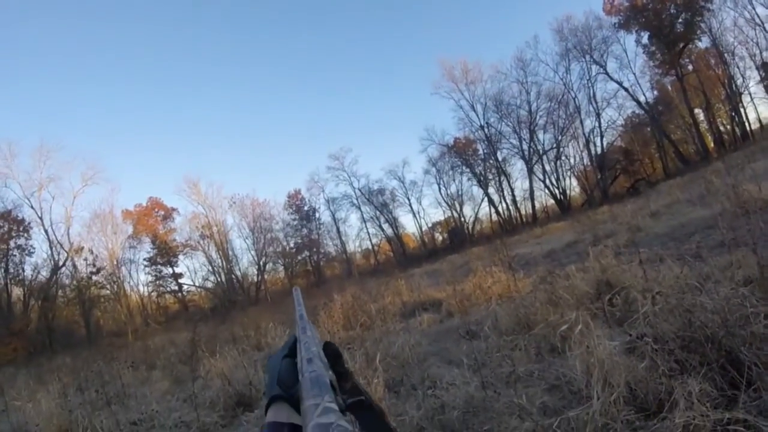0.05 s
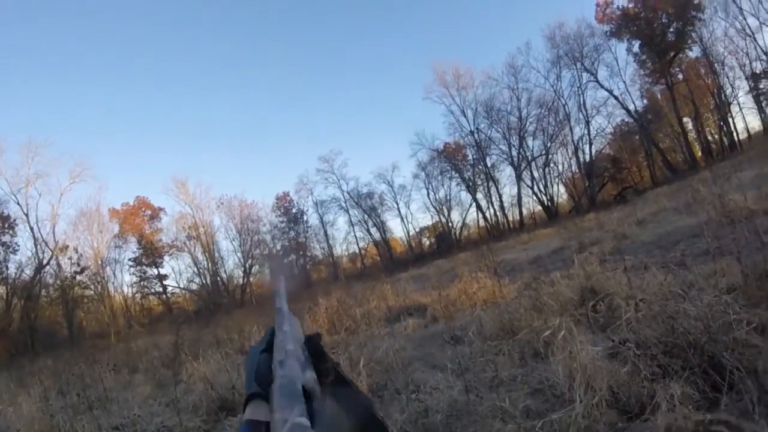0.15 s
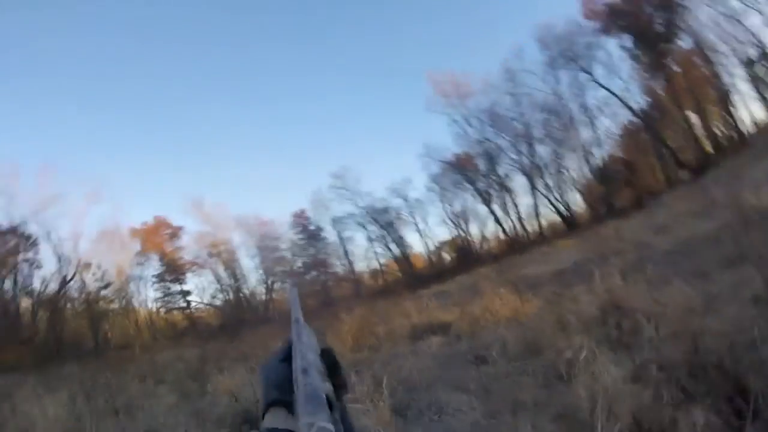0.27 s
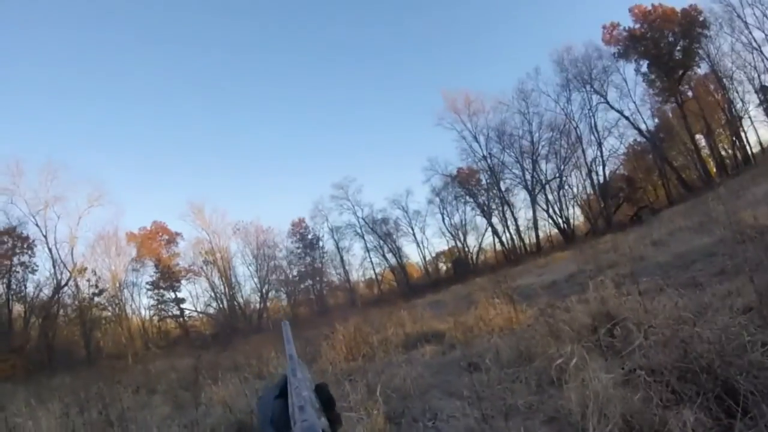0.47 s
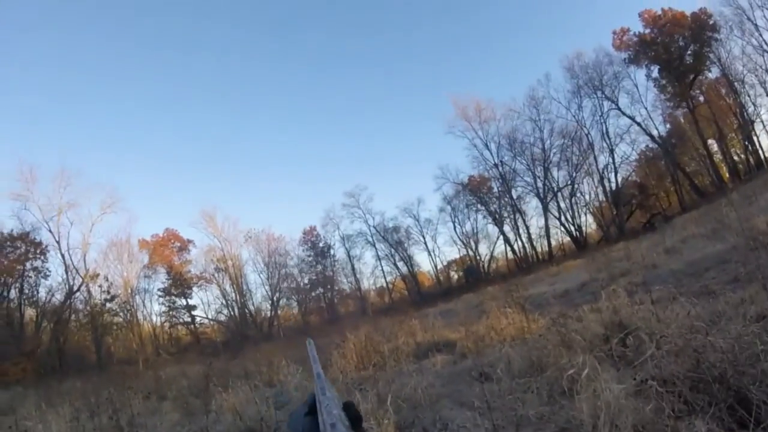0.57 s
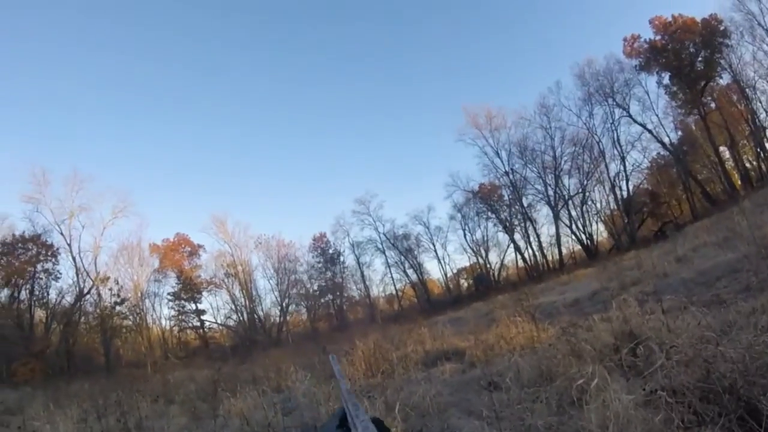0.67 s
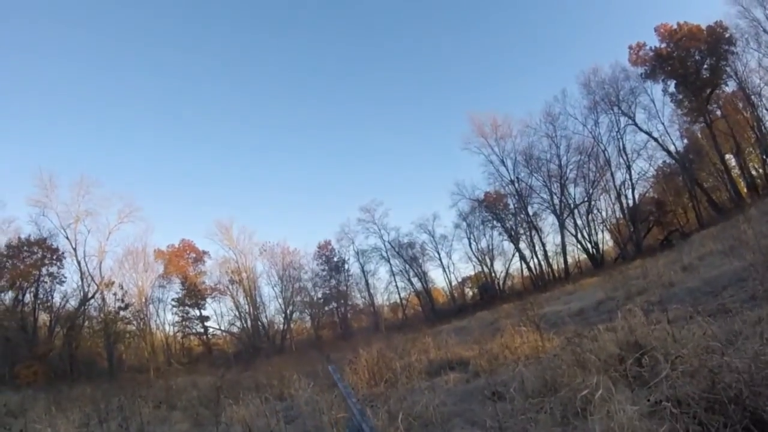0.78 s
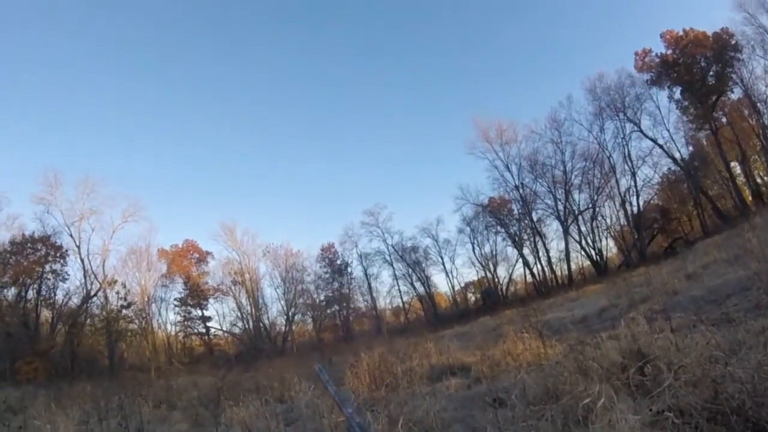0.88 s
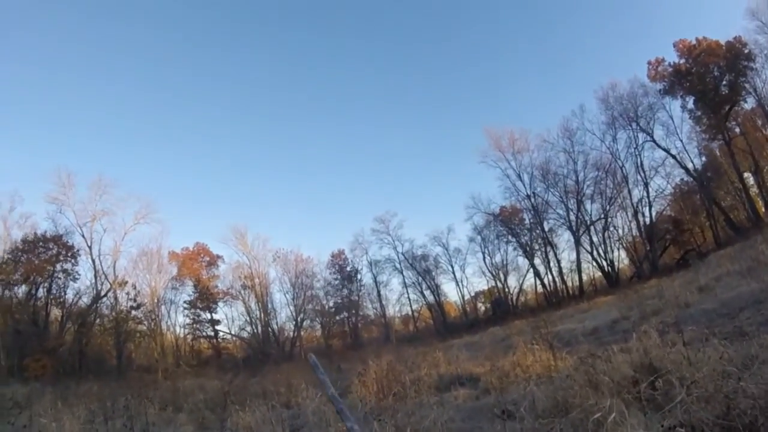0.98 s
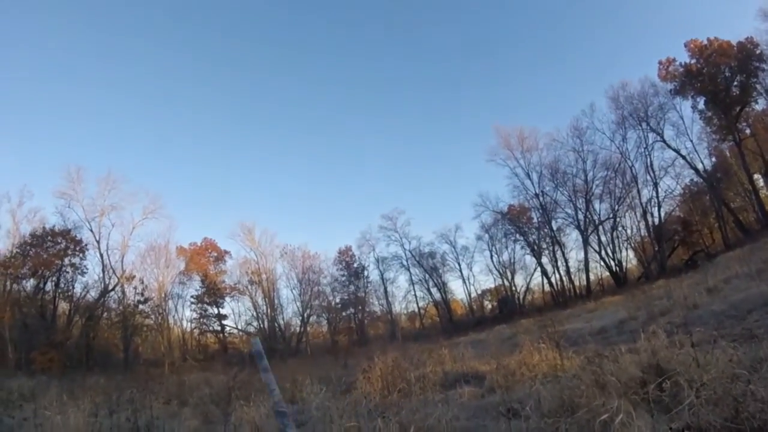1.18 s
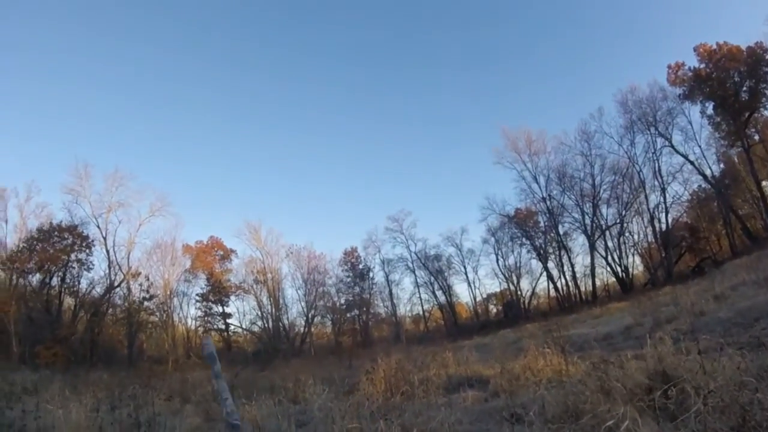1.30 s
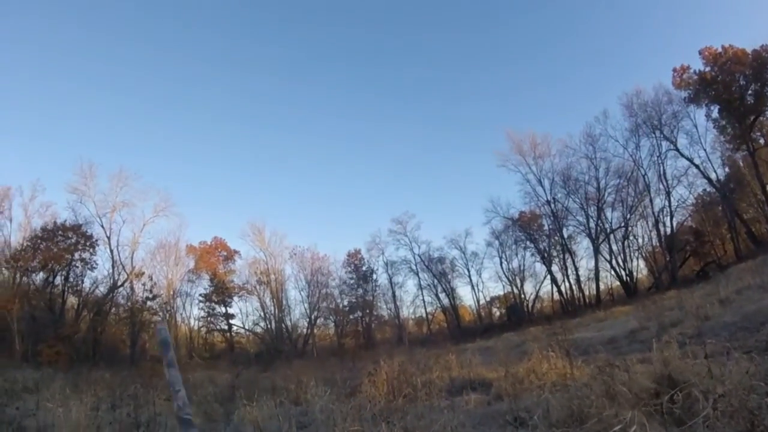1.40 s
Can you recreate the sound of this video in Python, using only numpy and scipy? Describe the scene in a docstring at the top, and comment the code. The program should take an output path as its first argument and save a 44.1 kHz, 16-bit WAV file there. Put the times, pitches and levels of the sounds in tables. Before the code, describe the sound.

A single shotgun shot cracks very close, with a brief clack and quickly dying hiss; the sound ducks, then a rough echo rolls back from the trees over a faint distant rush and small gear noises.

```python
"""An open field ringed by trees: one shotgun shot, heard from the shooter's head.
Shock pulses and damped rings make the crack, then a slow pressure swing; noise bursts make gas and action.
Grass is quickly dying hiss; the tree line is a rolling echo of random impulses, duller with distance.
Shaped noise gives a distant rush, light wind, faint microphone hiss and small gear noises; a look-ahead
limiter ducks them around the shot."""
import sys
import numpy as np
from scipy import signal
from scipy.fft import rfft, irfft
from scipy.io import wavfile
from scipy.ndimage import minimum_filter1d

SR = 44100
rng = np.random.default_rng(int(sys.argv[2]) if len(sys.argv) > 2 else 0)


def to_wav(sig):
    """Store sig (one row per channel, or 1-D mono) as 16-bit WAV at the path in sys.argv[1].

    Samples outside -1..1 are clipped; the rate is SR.
    """
    pcm = np.clip(np.atleast_2d(sig), -1, 1) * 32767
    pcm = np.round(pcm).astype(np.int16)
    wavfile.write(sys.argv[1], SR, pcm.T)  # frames by channels


N = 63945
T = np.arange(N) / SR  # time [s]

# Distant rush with the last far echoes: (time [s], level [dB])
FAR_LEVEL = [(0, -42), (.17, -44), (.45, -51.5), (.8, -41), (1.05, -38), (1.25, -39), (1.45, -40.5)]
# Tone of the distant rush: (frequency [Hz], level [dB])
FAR_COLOUR = [(40, -10.5), (90, -4.5), (135, -2.5), (225, -16), (370, -1.5), (650, 0.5), (820, -2.5),
              (1200, -9), (1900, -14), (2800, -21.5), (4000, -29.5), (6200, -35), (7500, -43), (10000, -53),
              (12000, -58), (14000, -80)]
FAR_DULLING_START_S, FAR_DULLING_DB_PER_KHZ_S = 0.89, 7

# Wind on the microphone: (time [s], level [dB])
WIND_LEVEL = [(0, -65), (.15, -51), (.85, -63), (1.05, -53.5), (1.3, -62.5), (1.38, -50.5), (1.45, -55)]
# Tone of the wind: (frequency [Hz], level [dB])
WIND_COLOUR = [(15, 0), (30, -1), (70, -1.5), (150, -14), (400, -49), (2000, -88)]

# Faint steady microphone hiss, rising slightly later: (time [s], level [dB])
HISS_LEVEL = [(0, -67.5), (.9, -68), (1.25, -63.5), (1.45, -64.5)]
# Ticks of dry grass and clothing: (time [s], level [dB])
TICKS = [(.009, -50), (0.059, -53), (0.1178, -60), (0.16, -52.5), (0.7852, -44), (.813, -50), (.930, -53),
         (0.986, -48.5), (1.422, -46)]
TICK_T60_S = 0.013
# Tone shared by ticks, sleeve and hiss: (frequency [Hz], level [dB])
TICK_COLOUR = [(500, -25), (3000, -11), (4500, -5), (5600, -0.5), (6600, -0.5), (7500, -9.5), (9000, -13),
               (12000, -29), (14000, -43)]
SLEEVE_S, SLEEVE_WIDTH_S, SLEEVE_DB = 1.16, 0.037, -62
# Tinkles of small metal fittings: (time [s], level [dB], pitch [ratio])
TINKLES = [(0.0492, -46, 0.97), (.091, -61, 0.96), (0.108, -61, 1.1), (1.0912, -44.5, 1.01),
           (1.124, -49, 1.1)]
# Modes of one fitting, before pitch and tinkle level: (frequency [Hz], level [dB], t60 [s])
FITTING_MODES = [(5600, -2.5, 0.059), (5800, -5, 0.046), (8300, -23, .04)]

# Rolling echo from the tree line: (time [s], level [dB])
ECHO_LEVEL = [(.415, -43), (0.435, -26.5), (0.443, -36), (.453, -42), (0.464, -30), (0.499, -27.5),
              (0.521, -31), (0.542, -32), (0.551, -37), (0.587, -29), (0.605, -34.5), (0.631, -29.5),
              (0.674, -35), (.704, -28.5), (.742, -37.5), (0.755, -34), (.8, -42.5)]
# Tone of the echo at its middle: (frequency [Hz], level [dB])
ECHO_COLOUR = [(30, -28), (50, -10.5), (80, -5), (180, -2), (300, -2.5), (390, 2.5), (520, -1), (780, 0.5),
               (1000, -3.5), (1400, -11.5), (2000, -13), (2700, -15), (4200, -22.5), (5800, -21),
               (6600, -27), (7500, -35), (10000, -49.5), (12000, -79)]
TRUNKS_PER_S, TRUNK_SPREAD_DB = 5000, 3
ECHO_MID_S, AIR_DB_PER_KHZ_S = 0.56, 3.5
# Single returns that stand out of the echo: (time [s], pitch [Hz], level [dB], t60 [s])
RETURNS = [(.4335, 1900, -25, .016), (.4348, 640, -14, .022), (.745, 470, -29, .13)]

# Levels of grass, gun and blast are relative: SHOT_DB raises all three together
SHOT_S, SHOT_DB = 0.2211, 40.5

# Tone of the scatter from nearby grass: (frequency [Hz], level [dB])
GRASS_COLOUR = [(20, -18), (45, -9), (100, -8), (200, -7), (380, -10), (550, -14.5), (1000, -16),
                (1800, -16.5), (3000, -16.5), (4000, -16.5), (5800, -12), (6600, -14.5), (7500, -22.5),
                (10000, -32.5), (11500, -46), (14000, -79)]
GRASS_DB, GRASS_FALL_DB_PER_S = -31.5, 234.5
EARLY_DB, EARLY_T60_S = -28.5, 0.067

# Hiss bursts from muzzle gas and action: (time [s], level [dB], t60 [s])
CLACKS = [(0.222, -20, 0.013), (0.2223, -23.5, 0.015), (0.2383, -16, 0.0099), (0.2406, -30, 0.035),
          (0.2708, -37, 0.041)]
CLACK_RISE_S = 0.00024
# Tone of the bursts and of the early grass hiss: (frequency [Hz], level [dB])
CLACK_COLOUR = [(300, -8), (1500, -7), (4300, -9.5), (5500, -10), (6600, -2), (8000, -12), (10000, -19),
                (12000, -36), (15000, -55)]
# Dull knocks of the recoil: (time [s], level [dB], decay [s])
KNOCKS = [(0.2698, -25.5, 0.002), (0.3033, -50, .002), (0.3617, -49.5, .002)]

# Shock fronts, direct and off gun and ground: (time [s], level [dB], decay [s], ring [dB])
FRONTS = [(0.2213, -5, .00008, -13), (0.2216, -8, .00008, 0), (0.2294, -11, .00022, -24)]
# Modes of the housing around the microphone: (frequency [Hz], level [dB], t60 [s])
HOUSING_MODES = [(820, -21, .018), (1430, -22, 0.018), (1736, -27, 0.018), (2246, -15, 0.016),
                 (3120, -13.5, 0.017), (3550, -24, 0.01), (5700, -5.5, .0065), (6510, -22, .014),
                 (8600, -24, 0.0095), (11270, -25, .006)]
SWING_S, SWING_DB = 0.2231, -1.5
SWING_RISE_S, SWING_CROSS_S, SWING_DECAY_S = 0.0015, 0.0042, 0.0057

CEILING_DB, RELEASE_DB_PER_S = -0.8, 195
AHEAD_S, HOLD_S, ATTACK_S = 0.0467, 0.035, 0.003
LOW_CUT_HZ, TOP_ROLL_HZ, CUTOFF_HZ = 5.3, 12500, 15600


def from_db(db):
    """Turn decibels into gain."""
    return 10 ** (np.asarray(db) / 20)


def rms_one(x):
    """Scale a signal to unit rms."""
    return x / np.sqrt(np.mean(x ** 2) + 1e-20)


def level(rows):
    """Gain that follows a (time [s], level [dB]) curve."""
    return from_db(np.interp(T, *np.transpose(rows)))


def coloured(colour, source=None):
    """White noise, or a given source, filtered to a tone curve and set to unit rms."""
    hz, db = np.transpose(colour)
    f = np.maximum(np.fft.rfftfreq(N, 1 / SR), 1)
    if source is None:
        source = rng.standard_normal(N)
    gain = from_db(np.interp(np.log(f), np.log(hz), db))
    return rms_one(irfft(rfft(source) * gain, N))


def dying(start, t60):
    """Envelope that opens at once and falls 60 dB in each t60."""
    return (T >= start) * np.exp(-np.log(1000) * np.clip((T - start) / t60, 0, 10))


def pulse(start, decay):
    """Pressure pulse with a steep front, an exponential tail and height 1."""
    u = np.clip((T - start) / decay, 0, 50)
    p = np.exp(-u) * (1 - np.exp(-4 * u))
    return p / p.max()


def ring(start, modes):
    """Damped resonances struck together, with alternating signs."""
    total = np.zeros(N)
    for k, (hz, db, t60) in enumerate(modes):
        tone = np.sin(2 * np.pi * hz * (T - start))
        total += (-1) ** k * from_db(db) * dying(start, t60) * tone
    return total


def through_air(x, loss_db_per_khz):
    """Tilt the treble by a time-varying loss that grows with frequency up to 8 kHz."""
    band_khz = np.array([0, 1, 2, 4, 8])
    f_khz, spectrum = np.fft.rfftfreq(N, 1000 / SR), rfft(x)
    total = np.zeros(N)
    # overlapping bands that sum to the whole, each with its own loss
    for khz, share in zip(band_khz, np.eye(len(band_khz))):
        band = irfft(spectrum * np.interp(f_khz, band_khz, share), N)
        total += band * from_db(-khz * loss_db_per_khz)
    return total


def distant_rush():
    """Shaped noise that swells with the last far echoes and slowly loses treble."""
    dulling = FAR_DULLING_DB_PER_KHZ_S * np.maximum(T - FAR_DULLING_START_S, 0)
    return level(FAR_LEVEL) * through_air(coloured(FAR_COLOUR), dulling)


def wind():
    """Low rumble of light wind on the microphone, rising and falling."""
    return level(WIND_LEVEL) * coloured(WIND_COLOUR)


def hiss_and_handling():
    """A faint hiss, noise ticks and a sleeve as the gun is lowered, plus ringing metal fittings."""
    ticks = sum(from_db(db) * dying(s, TICK_T60_S) for s, db in TICKS)
    sleeve = from_db(SLEEVE_DB) * np.exp(-0.5 * ((T - SLEEVE_S) / SLEEVE_WIDTH_S) ** 2)
    # one bright noise carries all three
    bright_noise = coloured(TICK_COLOUR) * (level(HISS_LEVEL) + ticks + sleeve)
    tinkles = np.zeros(N)
    for s, db, pitch in TINKLES:
        tinkles += from_db(db) * ring(s, np.array(FITTING_MODES) * [pitch, 1, 1])
    return bright_noise + tinkles


def tree_line():
    """Countless trunks return the blast as random impulses, duller the later they arrive."""
    hits = rng.random(N) < TRUNKS_PER_S / SR
    sizes = from_db(TRUNK_SPREAD_DB * rng.standard_normal(N))
    trunks = hits * rng.choice([-1, 1], N) * sizes
    first, last = ECHO_LEVEL[0][0], ECHO_LEVEL[-1][0]
    # quick fade in ahead of the first point, softer fade out after the last
    edges = np.exp(-np.maximum(first - T, 0) / 0.01 - np.maximum(T - last, 0) / 0.05)
    # negative ahead of the middle: early returns are brighter
    air_loss = AIR_DB_PER_KHZ_S * (np.clip(T, first, last) - ECHO_MID_S)
    echo = through_air(coloured(ECHO_COLOUR, trunks), air_loss)
    standouts = sum(ring(s, [mode]) for s, *mode in RETURNS)
    return level(ECHO_LEVEL) * edges * echo + standouts


def grass():
    """The near field scatters the blast back as two bright, quickly dying hisses."""
    fall_db = GRASS_FALL_DB_PER_S * np.maximum(T - SHOT_S, 0)
    scatter = coloured(GRASS_COLOUR) * (T >= SHOT_S) * from_db(GRASS_DB - fall_db)
    early = coloured(CLACK_COLOUR) * from_db(EARLY_DB) * dying(SHOT_S, EARLY_T60_S)
    return scatter + early


def gun():
    """Noise bursts for muzzle gas and clacking action, dull pulses for the recoil."""
    bursts = np.zeros(N)
    for s, db, t60 in CLACKS:
        rise = np.clip((T - s) / CLACK_RISE_S, 0, 1)
        bursts += from_db(db) * dying(s, t60) * rise
    knocks = sum(from_db(db) * pulse(s, decay) for s, db, decay in KNOCKS)
    return coloured(CLACK_COLOUR) * bursts + knocks


def blast():
    """Shock fronts ring the housing; a deep suction follows and swings back through zero."""
    crack = np.zeros(N)
    for s, db, decay, ring_db in FRONTS:
        crack += from_db(db) * pulse(s, decay) + from_db(ring_db) * ring(s, HOUSING_MODES)
    age = np.maximum(T - SWING_S, 0)
    # the suction builds up to its deepest point at SWING_S
    rise = np.clip(1 + (T - SWING_S) / SWING_RISE_S, 0, 1)
    swing = rise * (1 - age / SWING_CROSS_S) * np.exp(-age / SWING_DECAY_S)
    return crack - from_db(SWING_DB) * swing


def scene():
    """Background, gear and echo, with the shot and its near field far above them."""
    background = distant_rush() + wind() + hiss_and_handling()
    shot = from_db(SHOT_DB) * (grass() + gun() + blast())
    return (background + tree_line() + shot)[None]


def limiter(x):
    """The gain drops ahead of a peak, holds, then climbs back at a steady dB rate."""
    over_db = np.maximum(20 * np.log10(np.abs(x) + 1e-9) - CEILING_DB, 0)
    ahead, hold = int(AHEAD_S * SR), int(HOLD_S * SR)
    size = ahead + hold + 1
    # largest overshoot (minimum of the negative) from hold samples back to ahead samples forward
    peaks = -minimum_filter1d(-np.pad(over_db, (hold, ahead)), size)
    held_db = peaks[size // 2:size // 2 + N]
    release_db = RELEASE_DB_PER_S * T
    cut_db = np.maximum.accumulate(held_db + release_db) - release_db
    r = np.exp(-1 / (ATTACK_S * SR))  # one-pole smoothing of the gain cut
    return x * from_db(-signal.lfilter([1 - r], [1, -r], cut_db))


def record(dry):
    """The microphone rolls off the top; then limiter, low cut and a steep top cut."""
    top_roll = signal.butter(4, TOP_ROLL_HZ, fs=SR, output="sos")
    low_cut = signal.butter(1, LOW_CUT_HZ, "high", fs=SR, output="sos")
    steep_cut = signal.cheby2(12, 70, CUTOFF_HZ, fs=SR, output="sos")
    limited = limiter(signal.sosfilt(top_roll, dry[0]))
    return signal.sosfilt(steep_cut, signal.sosfilt(low_cut, limited))[None]


dry = scene()
out = record(dry)
to_wav(out)
```